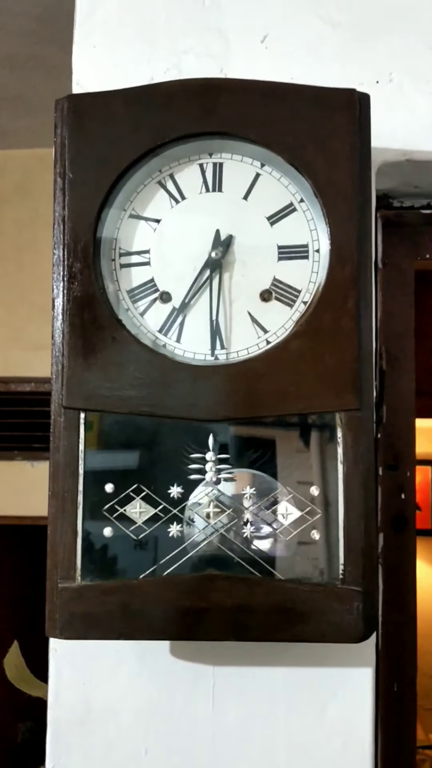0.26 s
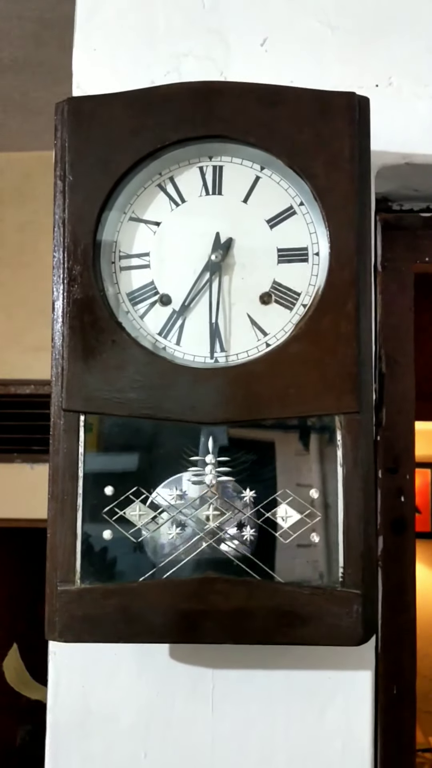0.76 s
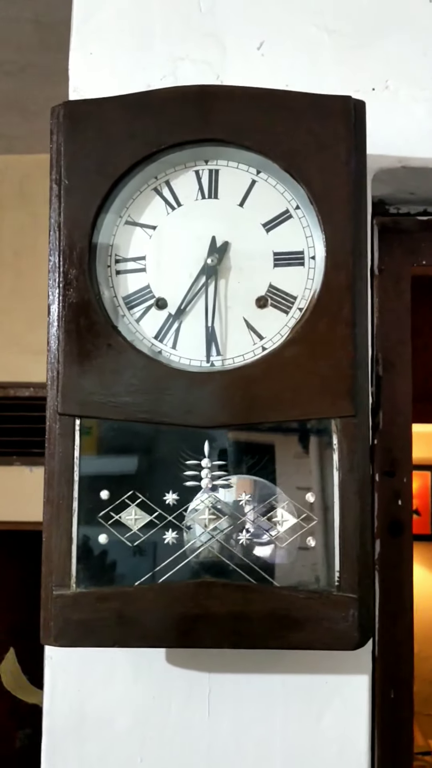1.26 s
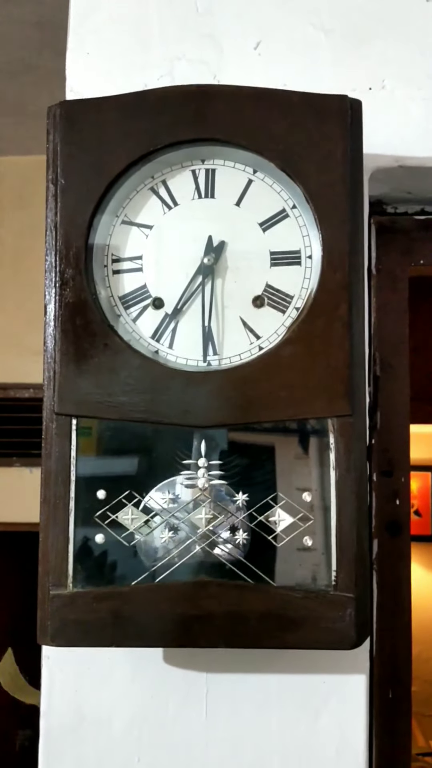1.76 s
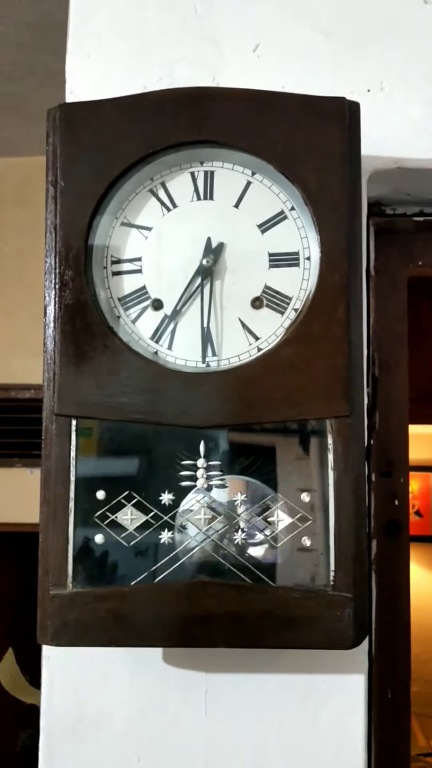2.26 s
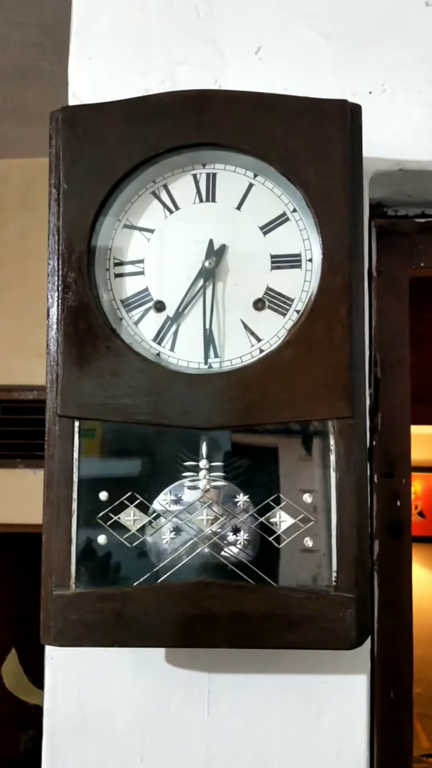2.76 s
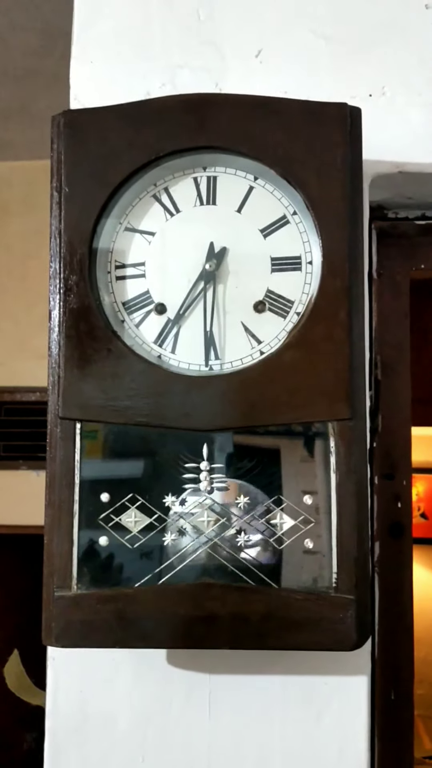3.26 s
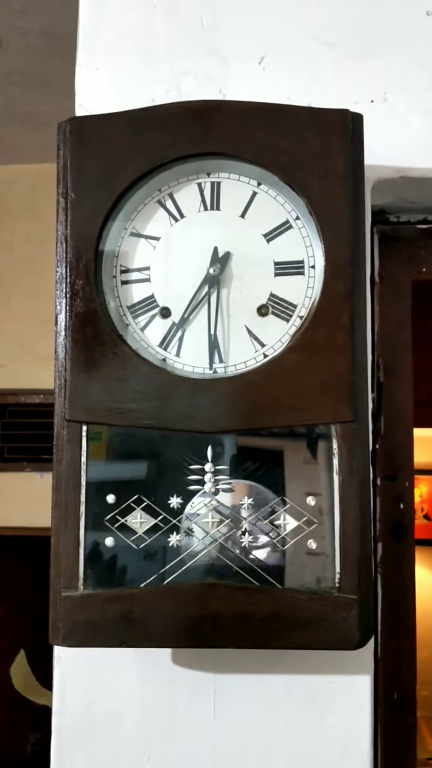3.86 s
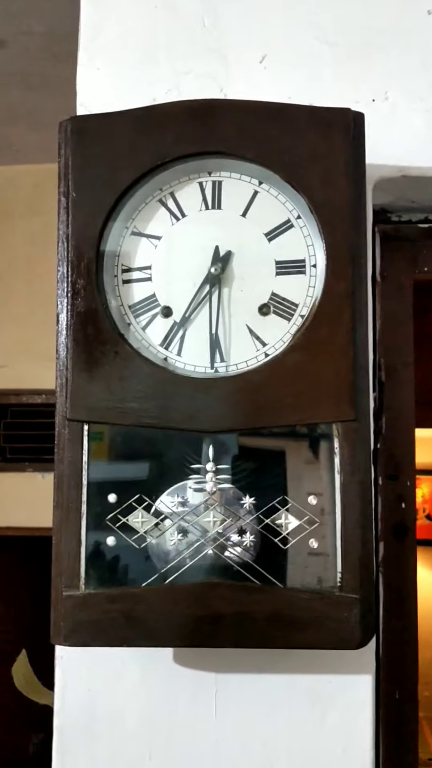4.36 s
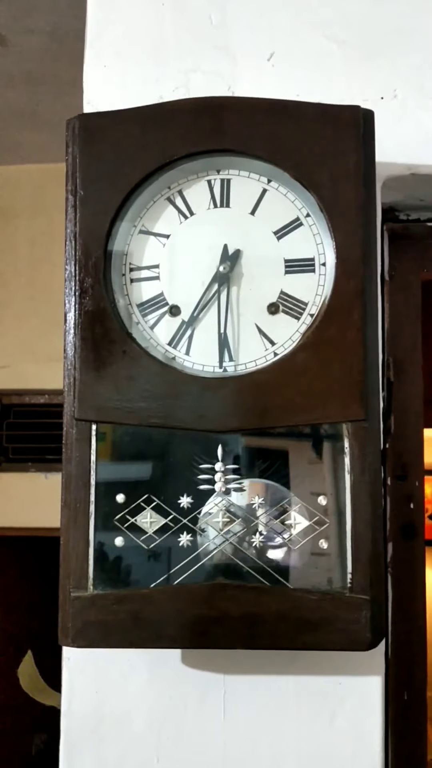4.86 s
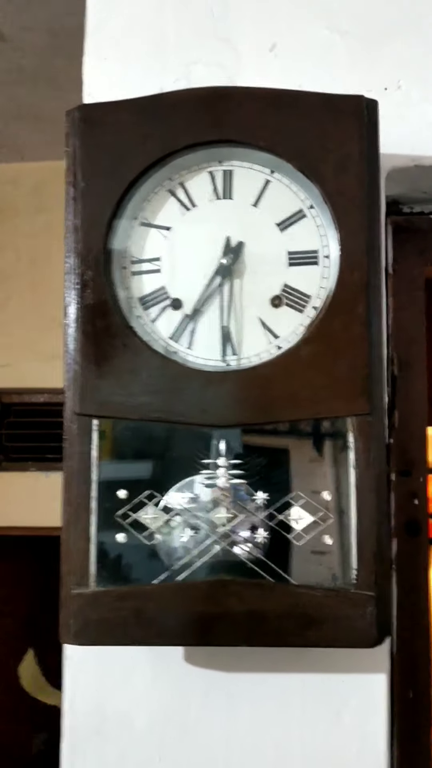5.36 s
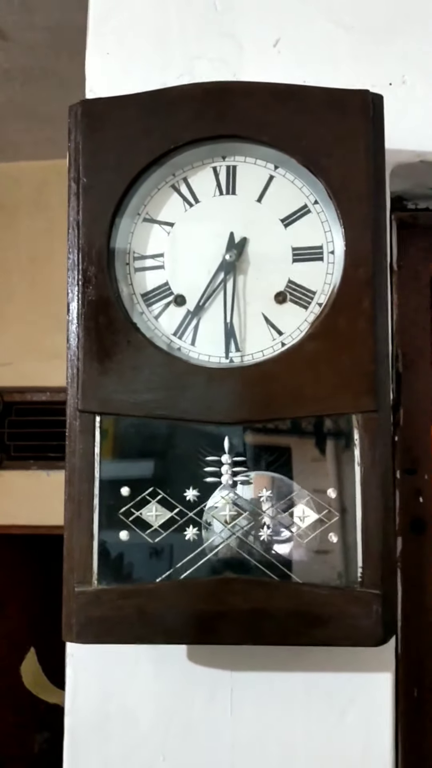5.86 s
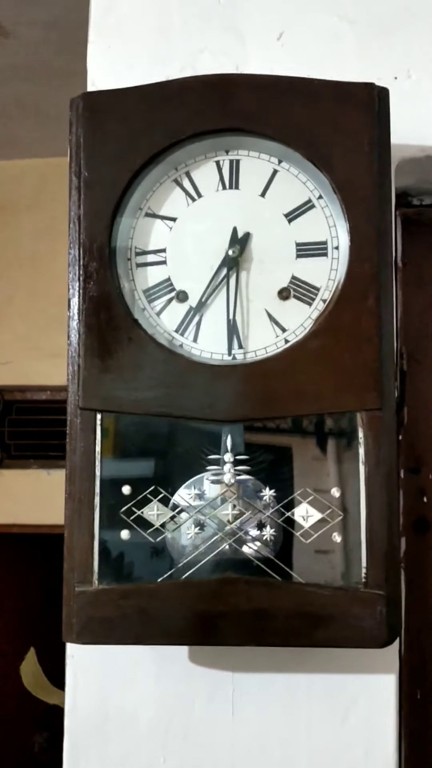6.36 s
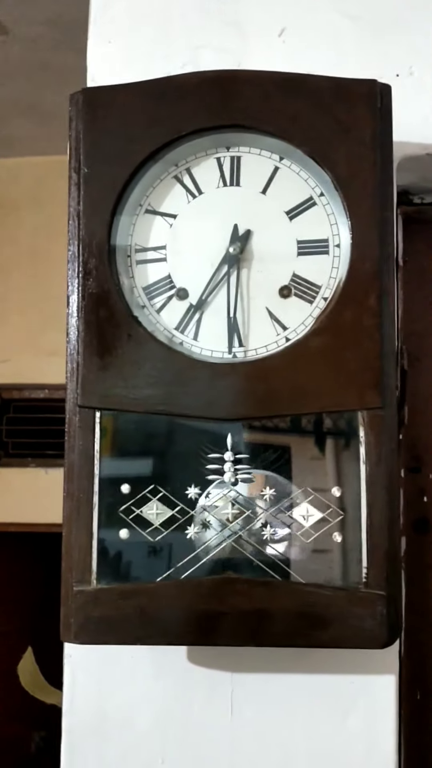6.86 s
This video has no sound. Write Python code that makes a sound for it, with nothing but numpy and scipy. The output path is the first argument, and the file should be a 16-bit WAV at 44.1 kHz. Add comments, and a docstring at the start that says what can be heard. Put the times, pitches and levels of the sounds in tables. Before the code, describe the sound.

From 0 s a low, steady motor hum, its deep buzz near two hundred hertz, fills a small room with a soft broad rush of air and faint background hiss. At about 0.1 s a nearby wooden pendulum clock ticks, with the tock at 0.5 s, the next tick at 1.0 and tock at 1.4. It continues so to about 6.9 s, sixteen beats in all, gaps alternating roughly 0.4 and 0.5 s. Each beat is a short, dry mid-pitched knock with tiny rapid rebounds and a fine metallic sizzle, brightest to the right; ticks are crisper, tocks more clattery. A thin, wavering high whine with quickly pulsing hiss creeps in after 0.6 s. Hum, whine and beats swell until about 3.3 s, then hold level to the end at about 7 s, cutting off without a fade. Close phone pickup, slight room tail.

```python
"""In a room, a spring-driven pendulum wall clock beats unevenly, tick then tock, in its wooden case near a phone.
A compressor motor hums and whines as a sum of sines on the orders of its shaft, over filtered noise: a broad
rush of air, a hiss pulsed once a turn and a faint background. Each beat sums decaying modes struck by a tooth's
drop and rebounds, plus a sizzle of shaped noise. Hum, whine and beats grow louder during the first seconds."""
import sys
import numpy as np
from scipy import signal
from scipy.fft import rfft, irfft, next_fast_len
from scipy.io import wavfile
from scipy.ndimage import uniform_filter1d, map_coordinates

SR = 44100
rng = np.random.default_rng(int(sys.argv[2]) if len(sys.argv) > 2 else 0)


def transcribe(u):
    """Save the signal u as a 16-bit wav file named by the first command-line argument.

    u: samples, shape (n,) or (channels, n), limited to [-1, 1]; the rate is SR.
    q: integer samples, one column per channel.
    """
    v = np.clip(np.atleast_2d(u).T, -1, 1)
    q = np.round(v * 32767).astype(np.int16)
    wavfile.write(sys.argv[1], SR, q)


N = 314467

# Growth of hum with rush, and of whine: start_s, hum_level_db, whine_level_db
GROWTH = [(0.0, -49, -98), (0.48, -49.5, -96), (0.6, -48, -87), (0.9, -47.5, -78), (2.56, -46.5, -73.5),
          (3.2, -44.5, -69), (3.29, -44, -66.5), (7.13, -44, -66.5)]
# Motor lines, relative levels: shaft_order (multiple of shaft speed), left_db, right_db
SHAFT_ORDERS = [(2, -65, -65), (3, -58, -58), (4, -51, -53), (15, -68, -68), (16, -63, -64), (17, -59, -62),
                (19, -70, -68), (20, -63, -68), (21, -66, -66), (22, -67, -70), (25, -72, -66),
                (26, -68, -73), (37, -65, -71), (40, -70, -70), (54, -70, -71), (55, -82, -76),
                (59, -82, -85), (74, -98, -112), (75, -95, -112), (76, -98, -112), (96, -100, -87),
                (97, -89, -80), (98, -81, -83), (99, -73, -80), (100, -79, -78), (103, -92, -89),
                (104, -95, -88), (105, -88, -88), (112, -102, -73), (113, -93, -82), (114, -107, -81),
                (117, -117, -84), (120, -116, -81), (121, -113, -80), (123, -100, -84), (124, -97, -87)]
# Rush of air, relative density: frequency_hz, left_db, right_db
RUSH_SPECTRUM = [(19.8, -89.5, -99), (44.6, -91, -93), (109, -76, -74), (236, -71.5, -72),
                 (321, -73.5, -74.5), (487, -77.5, -78), (686, -77.5, -78), (1170, -83.5, -83),
                 (1570, -82, -81.5), (2080, -86.5, -87.5), (2634, -86.5, -91), (2895, -101, -93),
                 (2976, -112, -108), (3440, -140, -140)]
# Hiss around the whine, relative density: frequency_hz, left_db, right_db
HISS_SPECTRUM = [(2730, -105, -105), (3270, -114, -112), (3350, -117, -120), (4000, -129, -129),
                 (4600, -116, -116), (4665, -101, -101), (4700, -98, -99), (4800, -104, -104),
                 (4980, -98.5, -97.5), (5050, -104, -104), (5250, -111, -110), (5300, -108, -101),
                 (5850, -113, -102), (6300, -120, -120), (6000, -122, -128), (7400, -135, -135)]
# Faint background noise, average density: frequency_hz, left_db_per_hz, right_db_per_hz
BACKGROUND_SPECTRUM = [(2000, -124, -127), (5500, -122, -126), (8500, -130, -130), (12800, -131, -131),
                       (14800, -129, -127), (16300, -133, -135)]
# Likeness of left and right noise: frequency_hz, correlation (-1 to 1)
STEREO_LIKENESS = [(60, 0.86), (180, 1), (550, 0.31), (1650, -0.13), (4970, -0.3), (15000, -0.76)]
# How steeply each part of the whine follows its growth: frequency_hz, slope_db_per_db
WHINE_STEEPNESS = [(3000, 3), (3600, 9.6), (4750, 1.17), (5030, 0.45), (5220, 1), (5400, 0.41), (5800, 2),
                   (7000, 3)]
# Beats, tick and tock in turn: start_s, relative_knock_db, relative_sizzle_db
BEATS = [(0.1225, -2, -2), (0.52, -3.5, -5), (1.0276, -0.5, -2), (1.4278, 2.5, 0), (1.9355, -2, 2),
         (2.3370, -1, -2.5), (2.8422, -0.5, -2.5), (3.2415, 1, -3.5), (3.7477, 2, -1), (4.1467, 2, -1),
         (4.654, 1.5, 2), (5.0531, 3, 0), (5.5617, 0, 1), (5.9602, 2.5, 1.5), (6.4685, 1, 0),
         (6.8657, 3.5, 0.5)]
# Modes of case and movement, relative levels:
# frequency_hz, t60_s, tick_db, tock_db, left_minus_right_db, left_lag_ms
MODES = [(720, .04, -11, -14, 0, .2), (990, .04, -7, -13, 5, .15), (1220, .018, -8, -9, 5, .05),
         (1380, .014, 4, -9, -12, .15), (1495, .022, -6, 2, -9, .47), (1660, .02, -9, -4, 1, .3),
         (1850, .02, -6, 0, -3, .42), (2070, .018, -4, 1, -4, .4), (2360, .008, 12.5, 4, 1.5, .42),
         (2690, .018, -12, -8, -8, .48), (2900, .03, -23, -23, -14, .3), (3240, .02, -34, -26, -24, .42),
         (3550, .04, -38, -36, -10, .42), (4880, .05, -38, -33, -10, .42),
         (5260, .05, -29.5, -38, -16, .42), (5560, .05, -40, -35, -12, .42),
         (6130, .04, -44, -38, -12, .42)]
# The drop on the pallet, then its rebounds, relative levels:
# tick_delay_s, tick_db, tock_delay_s, tock_db
CONTACTS = [(0, 0, 0, 0), (.0045, -13, .0048, -9), (.008, -9, .0092, -4), (.0112, -8, .0135, -8),
            (.02, -17, .018, -13)]
# Brass sizzle of the wheel, relative levels: frequency_hz, tick_db, tock_db, left_minus_right_db
SIZZLE_SPECTRUM = [(3000, -7.5, -16, -22), (3540, -11, -12.5, -14), (5090, -24, 4, -24.5),
                   (7250, -2.5, -12, -10), (8230, -14.5, -3, -18.5), (9900, -10.5, -5, -6.5),
                   (11300, -8, -18, -20.5), (13200, 11.5, 1.5, -17), (14300, 16, 6.5, -9.5),
                   (15400, 14, 4, -5), (16000, -29, -33.5, -11)]

SHAFT_HZ = 48.01
WHINE_FROM = 60  # first shaft order of the whine
MOTOR_LAG_S = .000205  # the motor reaches the left microphone later
FLICKER_ORDERS, FLICKER_DB = (70, 80), 7  # orders between these come and go together
HISS_PATCHY_DB, BACKGROUND_PATCHY_DB = 3.5, 4.5
TOP_HZ = 16225  # band limit of the phone

# Pairs are (tick, tock). These gains hold once the hum is full, before each beat's own offsets.
KNOCK_DB, SIZZLE_DB, BRASS_DB = (-32.5, -36), (-70, -55), (11.5, 5)
KNOCK_GROWS, SIZZLE_GROWS, BRASS_GROWS = 1.02, 0.92, 1.8  # dB per dB of hum growth
BRASS_FOLLOWS = -0.63  # dB per dB of a beat's knock strength
BRASS_HZ = 3100  # modes above belong to the movement, below to the case
SWELL_S, BRASS_SWELL_S = .0009, .003  # build-up time constants of case, movement
WOOD_HZ, WOOD_DB = (1600, 2200), (5, 3)  # rebounds drive these modes harder than the drop does
SIZZLE_PEAKS_DB, SIZZLE_PEAK_HZ = 4, 130  # narrow rings in the sizzle: spread, spacing
SIZZLE_GRAIN_DB = 4.5  # lumpiness of the sizzle in time
ROOM_DB = [[-14], [-17]]  # (left, right) of the room's answer to the sizzle
LEAD_S = .0007  # a beat starts this long before it is heard


def amp(db):
    """Decibel law: 20 dB is a tenfold amplitude."""
    return 10 ** (np.asarray(db) / 20)


def unit(x):
    """Normalisation to unit root-mean-square amplitude."""
    return x / np.sqrt(np.mean(x ** 2) + 1e-20)


def along(points, hz):
    """Logarithmic frequency interpolation, one row per value column of the points."""
    f, *cols = np.transpose(points)
    return np.array([np.interp(np.log(hz + 1), np.log(f + 1), c) for c in cols])


def wobble(rate, count):
    """Slow random modulation: splines through random knots, rate knots a second."""
    knots = rng.standard_normal((count, int(N * rate / SR) + 4))
    return np.array([map_coordinates(k, [np.arange(N) * rate / SR], order=2) for k in knots])


def patches(shape, bins, frames):
    """Local averaging: random values smoothed over frequency bins and time frames."""
    over_hz = uniform_filter1d(rng.standard_normal(shape), bins, axis=0)
    return unit(uniform_filter1d(over_hz, frames, axis=1))


def filtered(x, response):
    """Linear filtering: the spectrum multiplied by a response of frequency."""
    n = x.shape[-1]
    m = next_fast_len(n + 8192)
    return irfft(rfft(x, m) * response(np.fft.rfftfreq(m, 1 / SR)), m)[..., :n]


def sides(lean_db):
    """Interchannel level difference, shared equally between left and right gains."""
    return amp([lean_db / 2, -lean_db / 2])


def air(spectrum, patchy_db):
    """Partly correlated noise: mid and side mixed by likeness, with a given density and patchy gain."""
    z = signal.stft(rng.standard_normal((2, N + 1024)), nperseg=512)[2]
    z = z * amp(patchy_db * patches(z.shape[1:], bins=5, frames=10))
    pair = unit(signal.istft(z, nperseg=512)[1][:, :N])

    def mid_side(hz):
        # cos^2 - sin^2 of this angle is the left-right correlation
        angle = np.arccos(np.clip(along(STEREO_LIKENESS, hz)[0], -1, 1)) / 2
        return np.array([np.cos(angle), np.sin(angle)])

    mid, side = filtered(pair, mid_side)
    stereo = np.array([mid + side, mid - side])
    return filtered(stereo, lambda hz: amp(along(spectrum, hz)) * np.sqrt(SR / 2))


def motor():
    """Harmonics of rotation: wavering shaft orders; high ones at loosely scattered phases trill amid pulsed hiss."""
    order, left_db, right_db = np.transpose(SHAFT_ORDERS)[:, :, None]
    left_phase = -2 * np.pi * order * SHAFT_HZ * MOTOR_LAG_S
    high = order[:, 0] >= WHINE_FROM
    turn = 2 * np.pi * np.cumsum(SHAFT_HZ * (1 + .0001 * wobble(1.48, count=1)[0])) / SR

    start_spread = np.where(high, 1.9, np.pi)[:, None]  # radians
    start_phase = rng.normal(0, 1, order.shape) * start_spread
    phase = order * turn + start_phase + 0.25 * wobble(4.4, count=len(order))
    lines = np.array([amp(left_db) * np.sin(phase + left_phase), amp(right_db) * np.sin(phase)])

    flickers = (order > FLICKER_ORDERS[0]) * (order < FLICKER_ORDERS[1])
    flicker_db = flickers * FLICKER_DB * (wobble(5, count=1) - .5)
    depth_db = np.where(high, 2.5, 1.5)[:, None]
    lines = lines * np.sqrt(2) * amp(depth_db * wobble(7, count=len(order)) + flicker_db)

    hiss = air(HISS_SPECTRUM, HISS_PATCHY_DB) * amp(3 * np.cos(turn))  # one pulse a turn
    hum = amp(0.18) * lines[:, ~high].sum(axis=1)
    whine = amp(0.5) * lines[:, high].sum(axis=1) + hiss
    return hum, whine


def hum_and_rush(hum):
    """Superposition: shaft hum and broad air noise share one growing level."""
    start_s, hum_db, _ = np.transpose(GROWTH)
    level_db = np.interp(np.arange(N) / SR, start_s, hum_db)
    return amp(level_db) * unit(hum + air(RUSH_SPECTRUM, patchy_db=0.73))


def growing_whine(whine):
    """Frequency-dependent growth: each band rises at its own slope, in patches while faint."""
    start_s, _, whine_db = np.transpose(GROWTH)
    full_db = whine_db.max()
    hz, t, z = signal.stft(unit(whine), SR, nperseg=512)
    growth_db = np.interp(t, start_s, whine_db - full_db)  # negative until full
    steep = along(WHINE_STEEPNESS, hz).T + 0.28 * patches(z.shape[1:], bins=3, frames=16)
    grown = signal.istft(z * amp(steep * growth_db), SR, nperseg=512)[1][:, :N]
    return amp(full_db) * grown


def background_noise():
    """Faint background noise: a random signal of given average density, uneven in time and frequency."""
    return air(BACKGROUND_SPECTRUM, BACKGROUND_PATCHY_DB)


def knock(t, pallet, brass_db):
    """Modal superposition: drop and rebounds excite decaying modes of the case and movement."""
    hz, t60, tick_db, tock_db, lean_db, lag_ms = np.transpose(MODES)[:, :, None]
    lag = np.array([lag_ms / 1000, 0 * lag_ms])  # left, right seconds
    swell = np.where(hz > BRASS_HZ, BRASS_SWELL_S, SWELL_S)
    wood = (hz > WOOD_HZ[0]) * (hz < WOOD_HZ[1])
    mode_db = (tick_db, tock_db)[pallet] + brass_db * (hz > BRASS_HZ)
    detuned_hz = hz * (1 + rng.normal(0, .005, hz.shape))
    out = np.zeros((2, len(t)))
    for contact in CONTACTS:
        after, contact_db = contact[2 * pallet:2 * pallet + 2]
        rebound = after > 0  # rebounds differ from beat to beat, the drop hardly
        u = np.maximum(t - after - lag - rebound * rng.normal(0, .00012), 0)
        level_db = mode_db + contact_db + rng.normal(0, 1 + rebound, hz.shape)
        level_db += rebound * WOOD_DB[pallet] * wood
        envelope = amp(level_db - 60 * u / t60) * (1 - np.exp(-u / swell)) ** 2
        ring = envelope * np.sin(2 * np.pi * detuned_hz * u)
        out += np.sum(sides(lean_db) * ring, axis=1)
    # loose wheels chatter on: the knock convolved with decaying noise
    rattle = rng.standard_normal(len(t)) * (t > .004) * amp(-35.5 - 60 * t / 0.17)
    return out + signal.fftconvolve(out, rattle[None], axes=1)[:, :len(t)]


def wheel_sizzle(t, pallet, brass_db):
    """Dense resonance as filtered noise: a direct burst and a lingering answer from the room."""
    # the sizzle's colour varies at random from beat to beat
    beat_colour = list(zip(np.transpose(SIZZLE_SPECTRUM)[0], rng.normal(0, 2, len(SIZZLE_SPECTRUM))))
    peaks_db = SIZZLE_PEAKS_DB * rng.standard_normal(SR // 2 // SIZZLE_PEAK_HZ)

    def colour(hz):
        spectrum = along(SIZZLE_SPECTRUM, hz)
        level_db = np.interp(hz / SIZZLE_PEAK_HZ, np.arange(len(peaks_db)), peaks_db)
        level_db = level_db + spectrum[pallet] + along(beat_colour, hz)[0]
        level_db = level_db + brass_db * (hz < 11000)
        return amp(level_db) * sides(spectrum[2]) * (hz > 2500)

    noise = unit(filtered(rng.standard_normal((2, len(t))), colour))
    u = np.maximum(t - (.0001, .002)[pallet], 0)  # the tock's sizzle peaks later
    rise = (1 - np.exp(-u / 0.0035)) ** 2
    near = rise * amp(-60 * u / (.15, .095)[pallet])
    far = rise * amp(ROOM_DB - 60 * u / .5)  # leans less to the right
    grain_db = SIZZLE_GRAIN_DB * np.interp(t * 400, np.arange(200), rng.standard_normal(200))
    return (amp(grain_db) * near + far) * noise


def clock():
    """Escapement impact: at each beat a tooth drops on one pallet, knocking the case and sizzling."""
    out, t = np.zeros((2, N + SR)), np.arange(SR // 3) / SR
    growth_s, hum_db, _ = np.transpose(GROWTH)
    for k, (start_s, strength_db, bright_db) in enumerate(BEATS):
        pallet = k % 2  # 0 tick, 1 tock
        growth_db = np.interp(start_s, growth_s, hum_db - hum_db[-1])  # negative until the hum is full
        knock_db = KNOCK_DB[pallet] + KNOCK_GROWS * growth_db + strength_db
        sizzle_db = SIZZLE_DB[pallet] + SIZZLE_GROWS * growth_db + bright_db
        brass_db = BRASS_DB[pallet] + BRASS_GROWS * growth_db + BRASS_FOLLOWS * strength_db
        beat = amp(knock_db) * knock(t, pallet, brass_db)
        beat += amp(sizzle_db) * wheel_sizzle(t, pallet, brass_db)
        start = round((start_s - LEAD_S) * SR)
        out[:, start:start + len(t)] += beat
    return out[:, :N]


def scene():
    """Linear superposition of hum with rush, whine, background noise and clock."""
    hum, whine = motor()
    return hum_and_rush(hum) + growing_whine(whine) + background_noise() + clock()


def record(dry):
    """Band limiting: the phone keeps nothing from its upper limit on."""
    return filtered(dry, lambda hz: hz < TOP_HZ)


dry = scene()
out = record(dry)
transcribe(out)
```